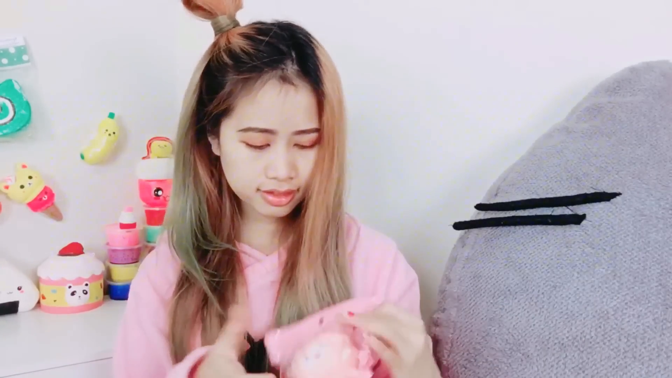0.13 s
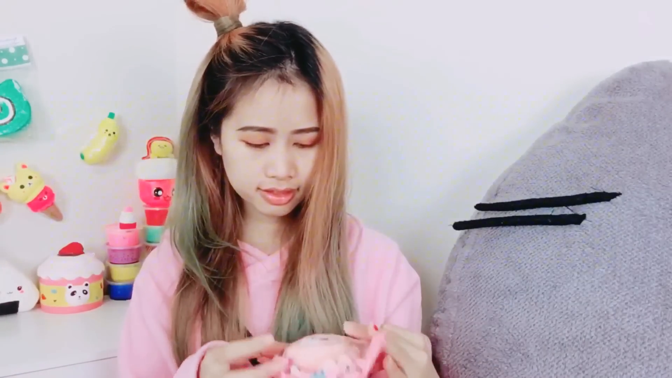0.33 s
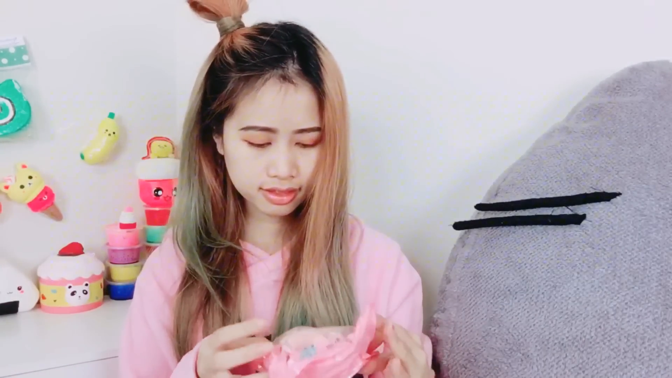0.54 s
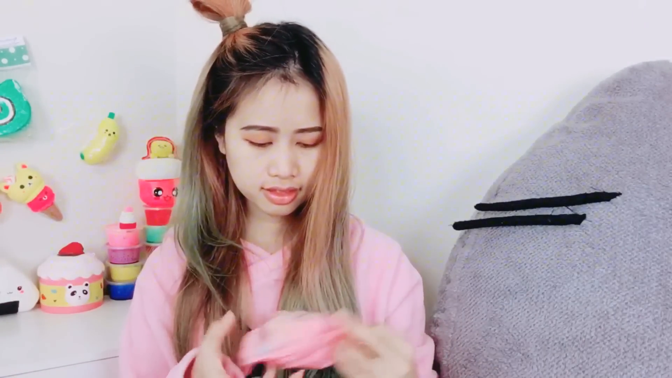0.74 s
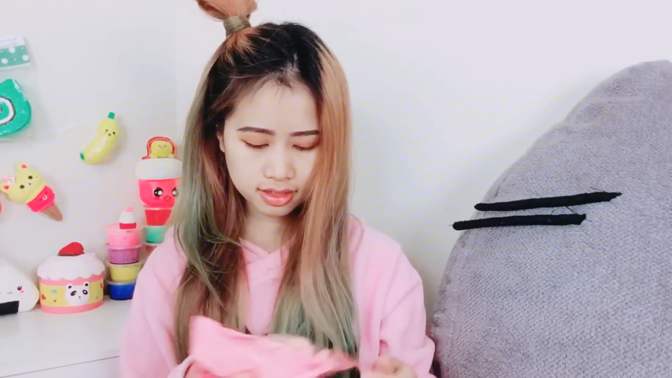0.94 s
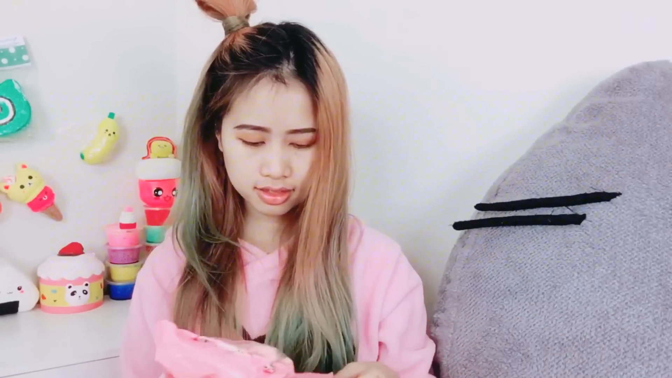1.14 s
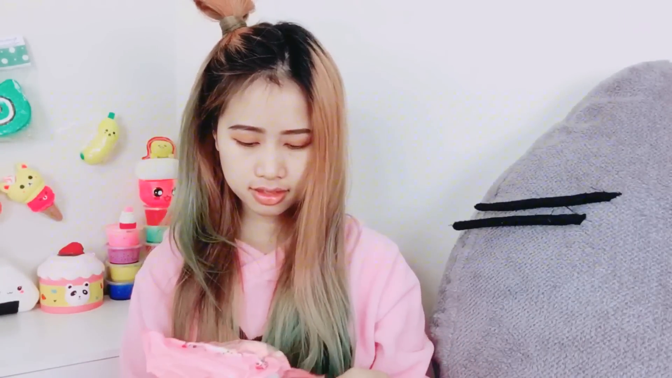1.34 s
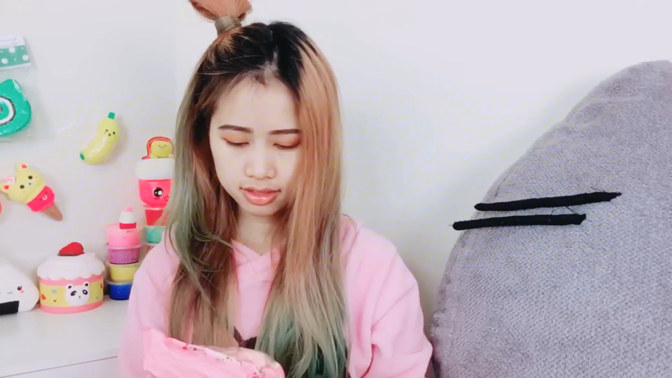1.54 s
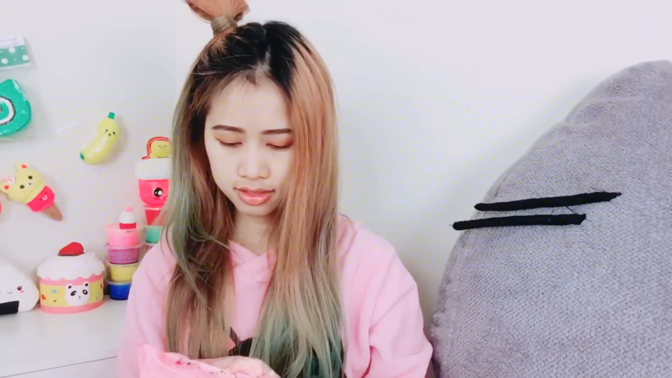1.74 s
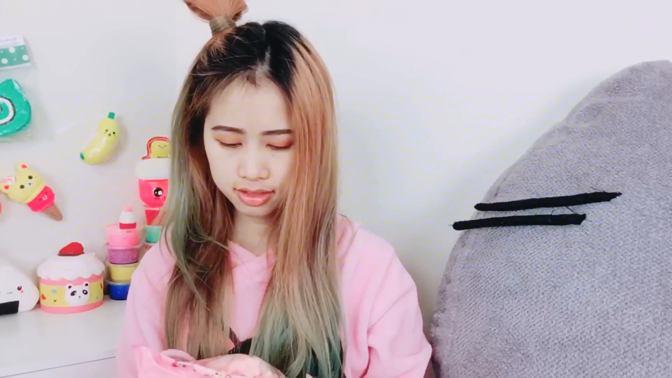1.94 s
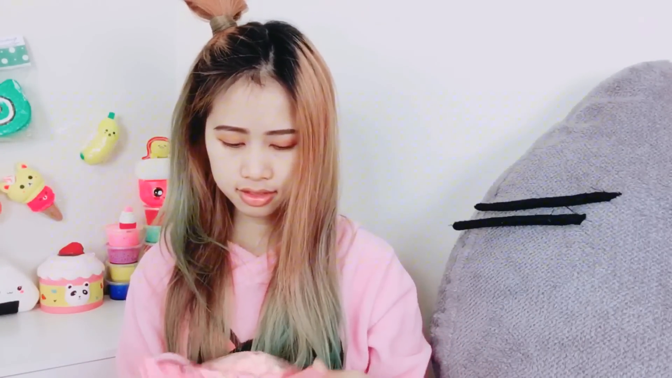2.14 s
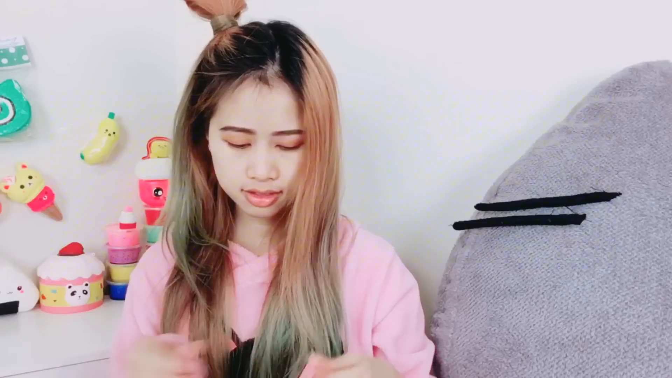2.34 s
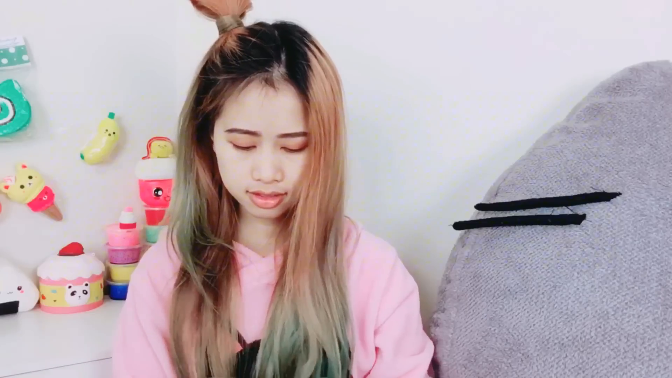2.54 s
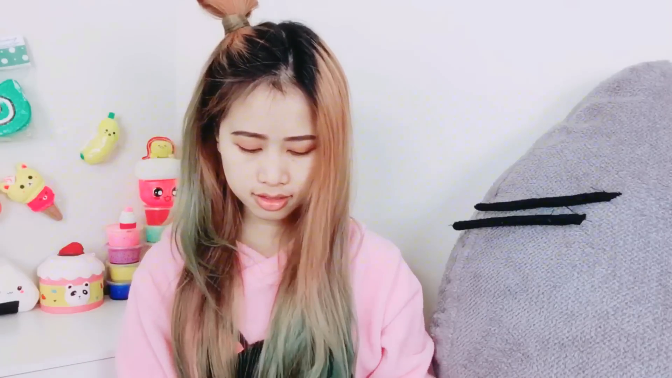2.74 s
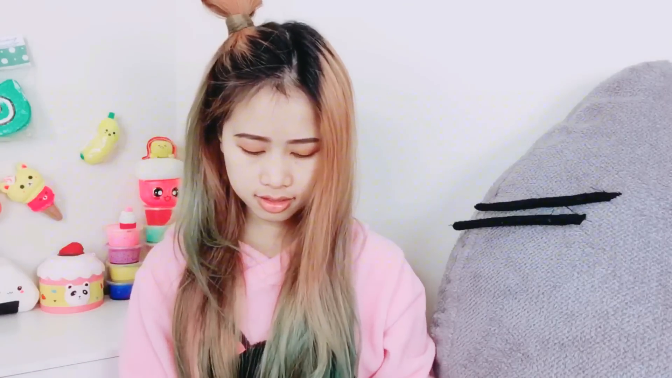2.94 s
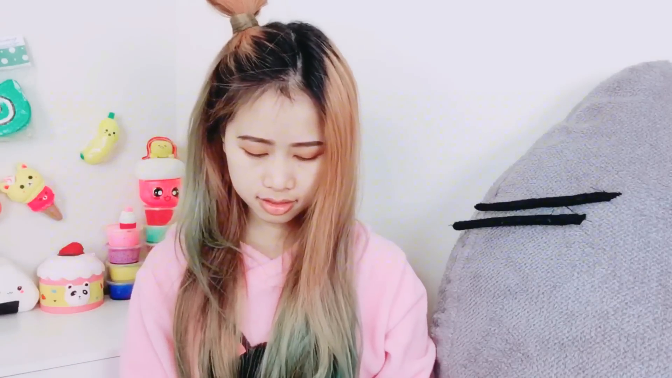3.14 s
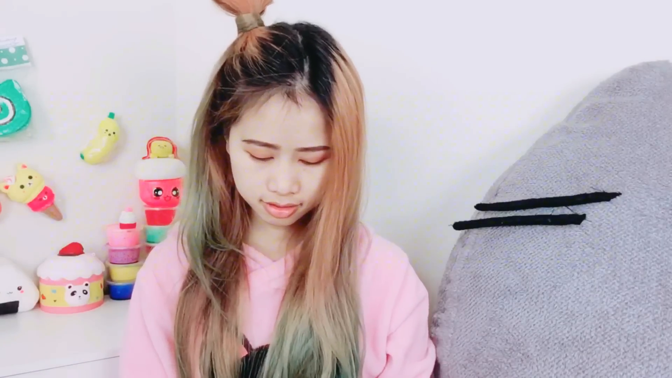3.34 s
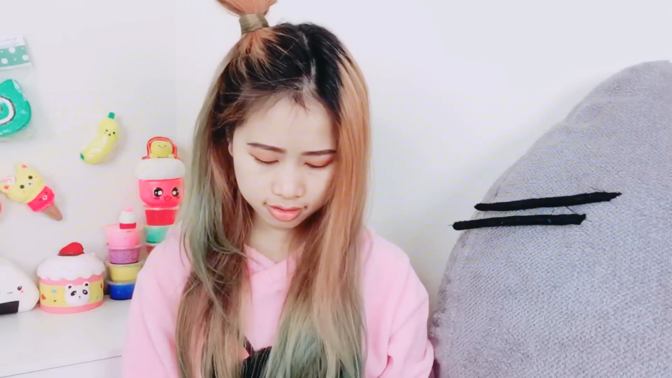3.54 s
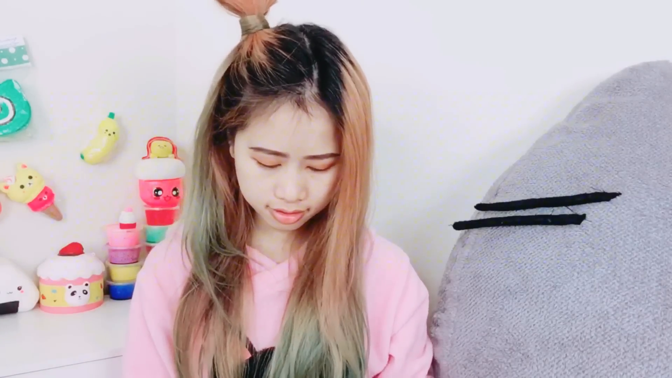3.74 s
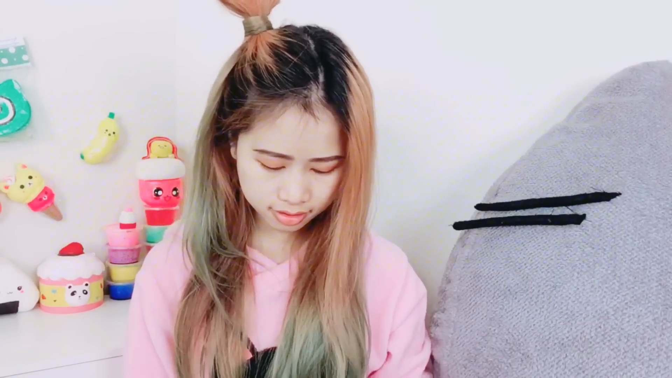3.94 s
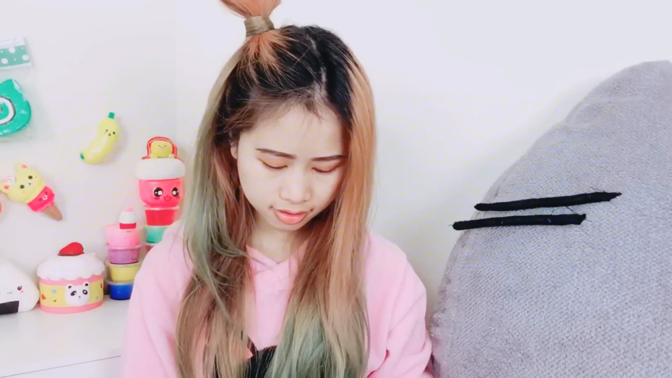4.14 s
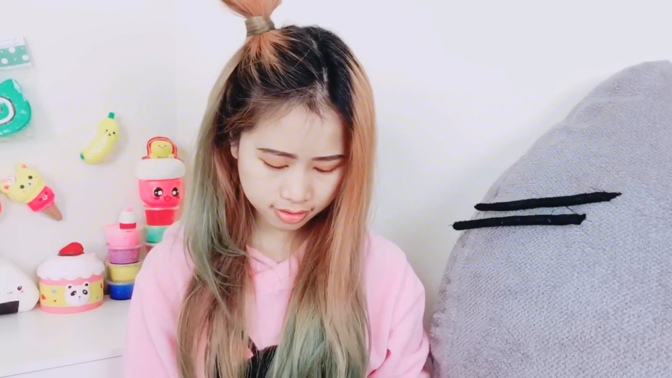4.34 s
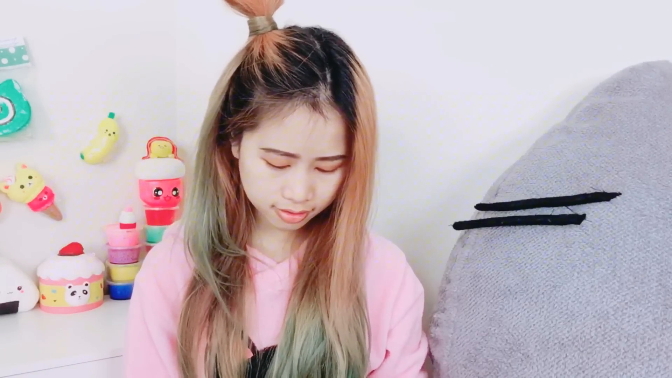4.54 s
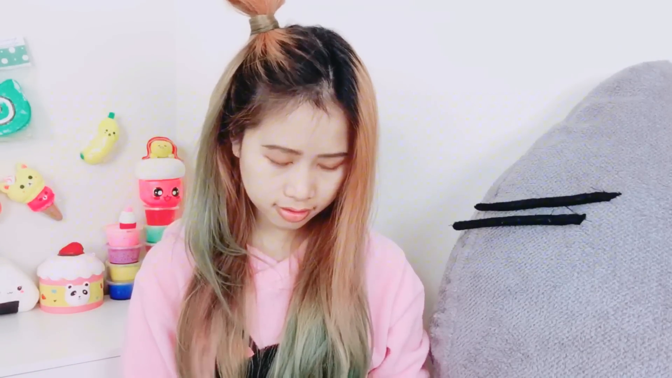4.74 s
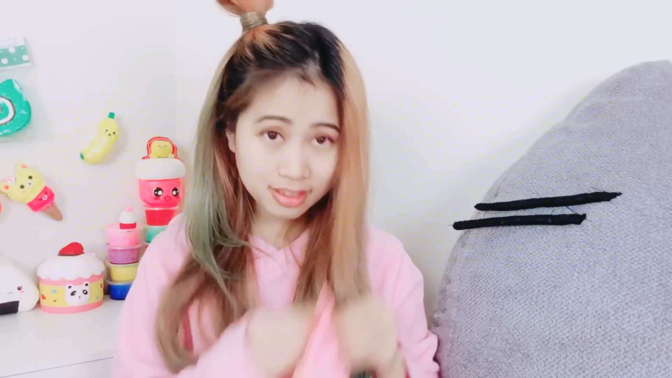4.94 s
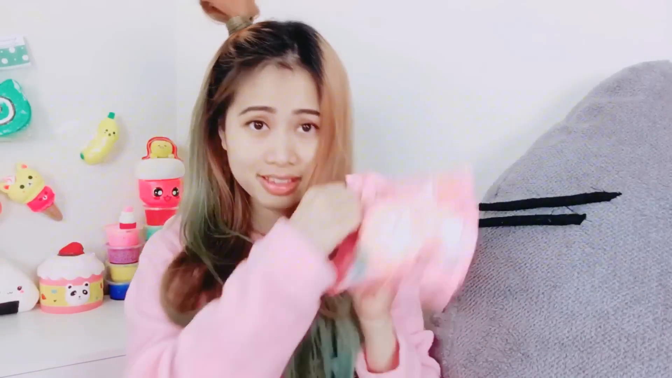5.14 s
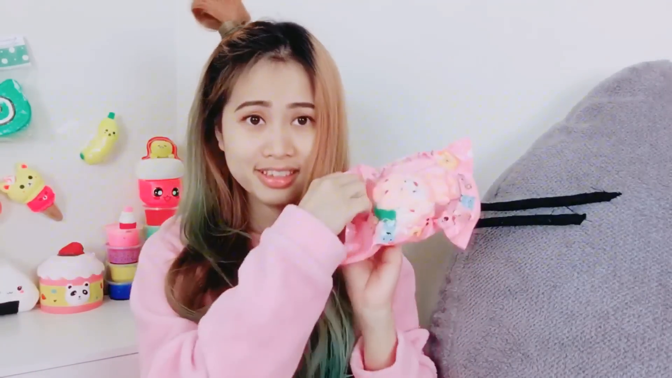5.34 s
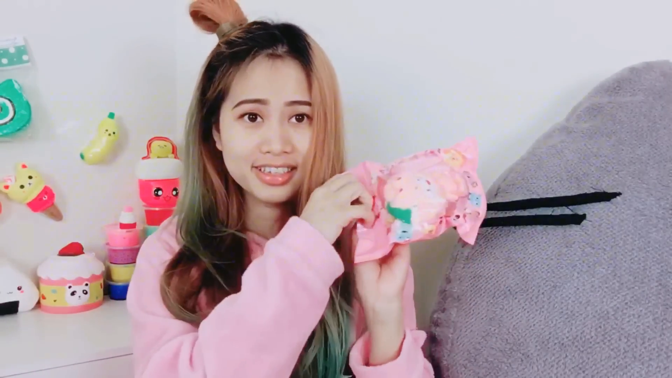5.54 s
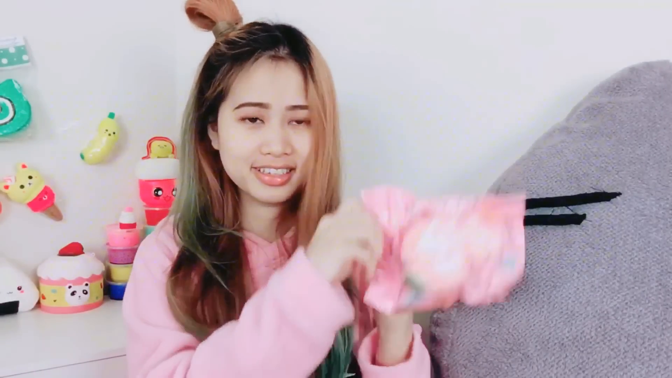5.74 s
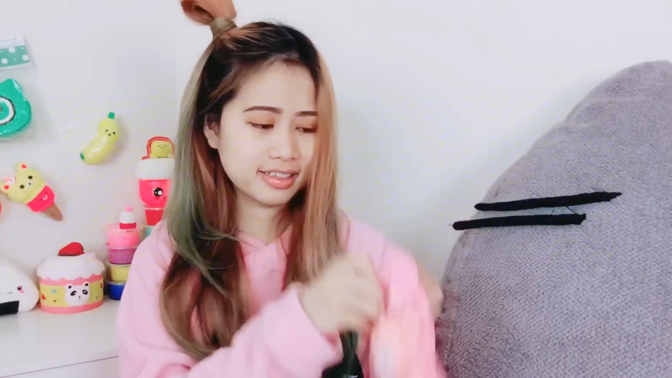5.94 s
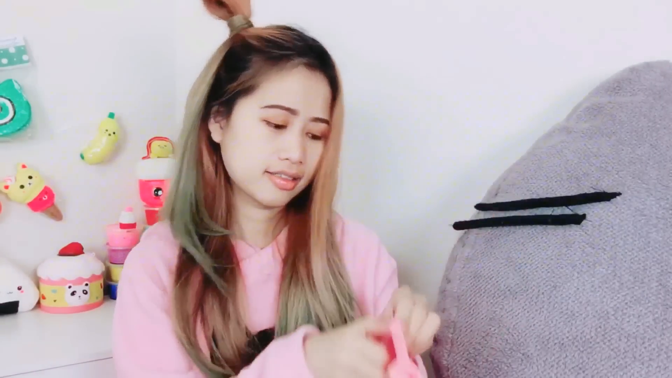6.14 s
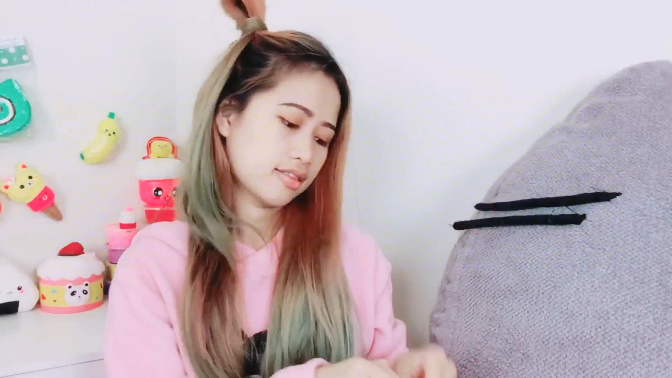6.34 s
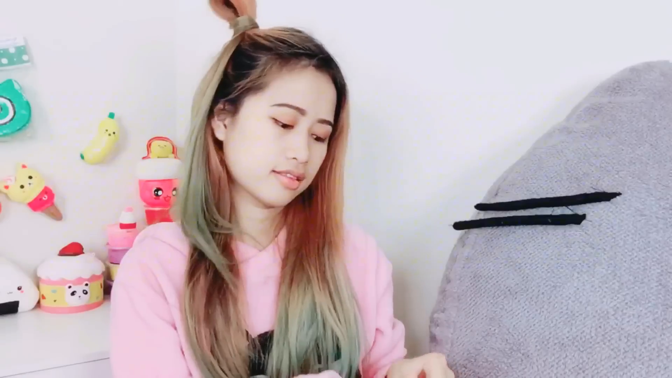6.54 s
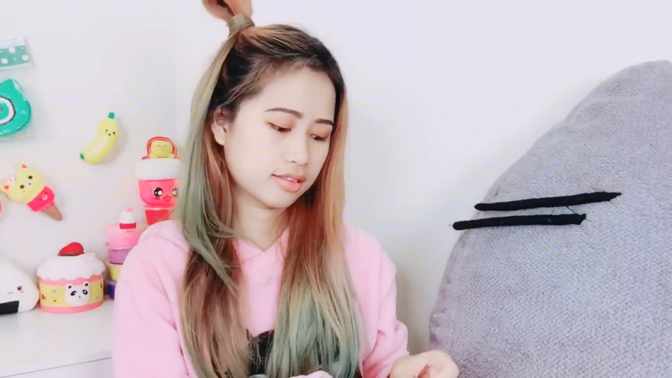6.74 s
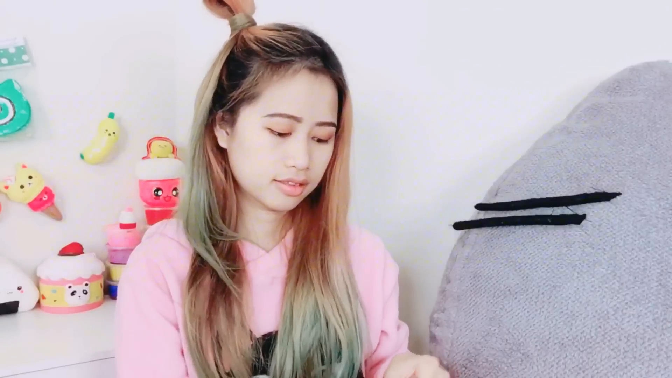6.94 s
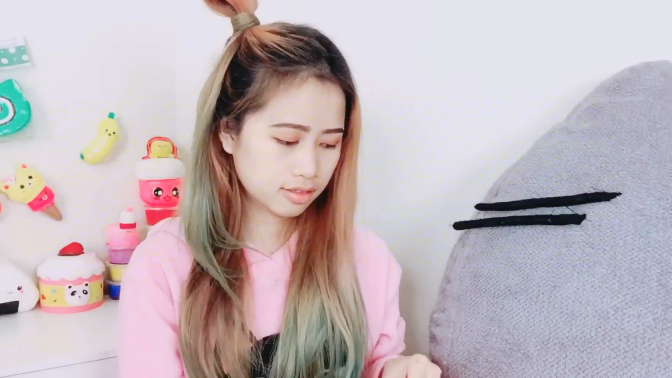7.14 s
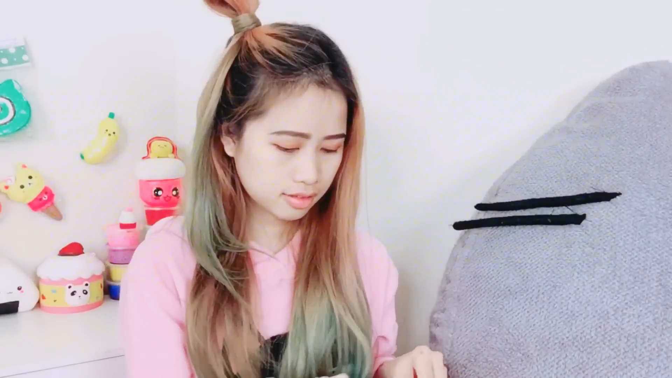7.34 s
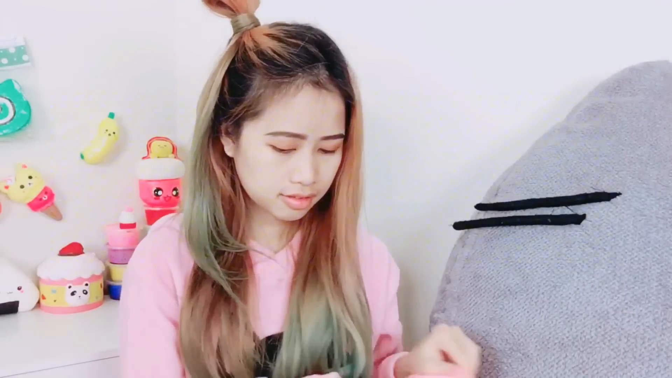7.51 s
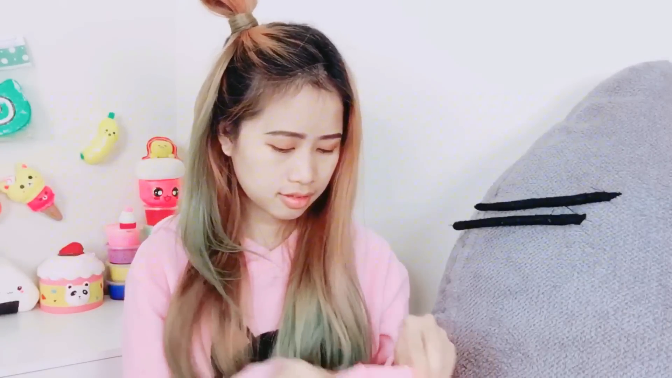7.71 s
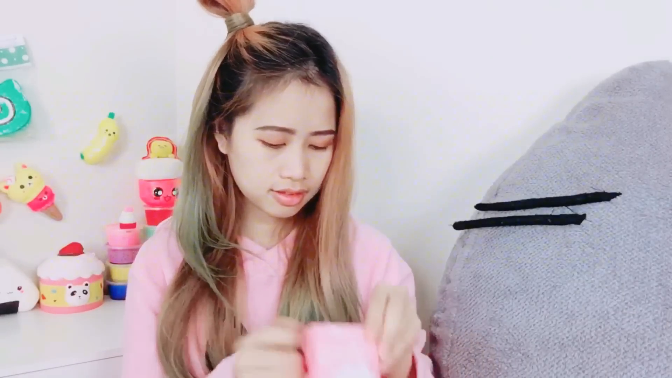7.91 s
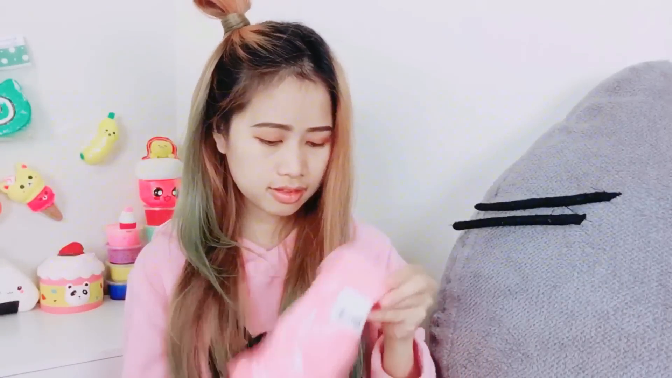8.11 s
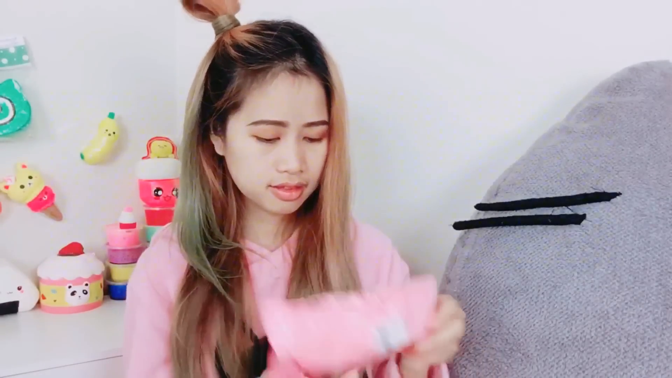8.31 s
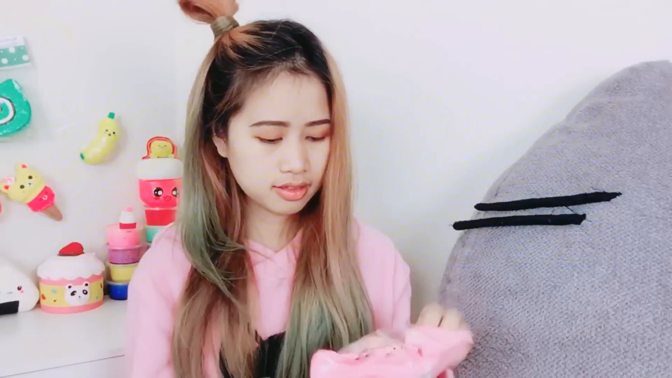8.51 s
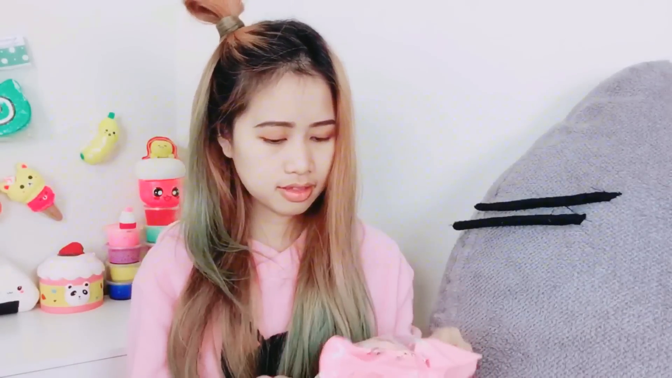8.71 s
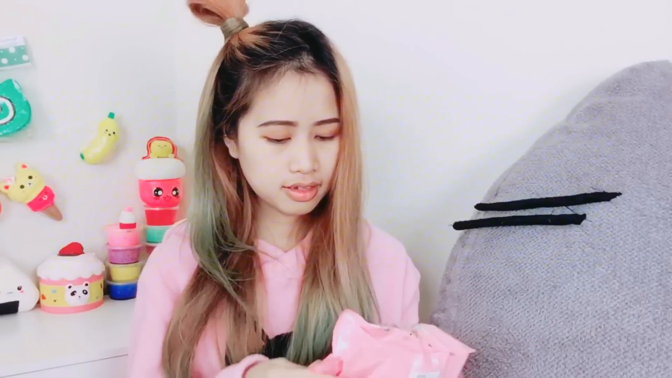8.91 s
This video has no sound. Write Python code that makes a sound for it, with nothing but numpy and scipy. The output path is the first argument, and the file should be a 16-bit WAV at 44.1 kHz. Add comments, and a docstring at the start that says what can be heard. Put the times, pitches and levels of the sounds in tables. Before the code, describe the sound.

Thin, stiff plastic packaging is handled right beside a small microphone in a quiet, soft room with very little echo. From 0 to 0.6 seconds it crackles densely, with bright, hard snaps and a low puff of air. After a short dip, irregular crunches resume from 0.9 to 2.1, with a strong snap near 1.1. A sharp, bright burst comes at 2.4-2.5 with a dull bump. From 2.6 to 5 the rustling is lighter, with scattered ticks and small squeezes around 3.5, 3.8 and 4.6. Near 5.1 there is a tiny rising squeak and a clear knock with a thump. Crinkles gather again from 5.9 to 6.8, then nearly stop around 7. At 7.6 a sudden, very loud crunch slightly overloads, followed by duller crackles, another squeeze at 8.1-8.25, and fading rustles with low air movement until 9.

```python
"""Creases of a thin plastic bag, turned and squeezed close to a small microphone, buckle with sharp snaps.
Each snap is a filtered burst of tiny slips; a dense crackle of smaller buckles and rubbing noise follows
the grip. One short squeak is a rough rising tone, bumps are dying sines, and the moving bag stirs low noise.
A quiet, soft room adds a brief scatter and a hush, and the loudest snaps overload the input."""
import sys
import numpy as np
from scipy import signal
from scipy.fft import rfft, irfft
from scipy.io import wavfile
from scipy.ndimage import uniform_filter1d

SR = 44100
rng = np.random.default_rng(int(sys.argv[2]) if len(sys.argv) > 2 else 0)


def volts_from_db(level):
    """Convert decibel levels to linear amplitude ratios."""
    exponent = np.asarray(level, float) / 20
    return 10 ** exponent


def unload_audio(sound):
    """Save the sound as a 16-bit wav file, at the path given as the first command line argument."""
    columns = np.transpose(np.atleast_2d(sound))
    # keep every value between -1 and 1, then stretch to whole-number steps
    steps = np.round(np.clip(columns, -1, 1) * 32767)
    wavfile.write(sys.argv[1], SR, steps.astype(np.int16))


N = 395577

# Relative spectrum of sound radiated by the film: frequency_hz, density_db [dB per Hz]
FILM_SPECTRUM = [(110, -19.5), (370, -8.5), (760, -4), (1000, -5), (2000, 0), (5900, 5.5), (9200, 3.5),
                 (13000, -4.5), (16200, -13)]


def evened(x):
    """Normalises signal power: scales to rms 1."""
    return x / np.sqrt(np.mean(x ** 2) + 1e-20)


def read(points, hz):
    """Interpolates a spectrum along a logarithmic frequency axis."""
    point_hz, value = np.transpose(points)
    return np.interp(np.log(hz + 1), np.log(np.abs(point_hz) + 1), value)


def add(mix, start_s, sound):
    """Superposition: sums a sound into the mix from its start time."""
    part = mix[max(round(start_s * SR), 0):][:len(sound)]
    part += sound[:len(part)]


def coloured(x, points):
    """Minimum-phase filtering: the Hilbert transform of the log gain gives the phase of a causal response."""
    hz = abs(np.fft.fftfreq(2048, 1 / SR))
    log_gain = np.log(volts_from_db(np.maximum(read(points, hz), -90)))
    response = np.exp(np.conj(signal.hilbert(log_gain)))
    taps = np.fft.ifft(response).real[:512]
    return np.convolve(x, taps / np.linalg.norm(taps))[:len(x)]


def noise(points):
    """Stationary Gaussian noise shaped by a power spectrum, at rms 1."""
    gain = volts_from_db(read(points, np.fft.rfftfreq(N, 1 / SR)))
    return evened(irfft(rfft(rng.standard_normal(N)) * gain, N))


def curve(rows, rest_db):
    """Exponential growth and decay: powers of all swells, each 20 dB per build or fade time, add to a rest."""
    t = np.arange(0, N + 64, 64) / SR
    power = volts_from_db(rest_db) ** 2
    for peak_s, level_db, build_s, fade_s in rows:
        # a time's sign is ignored; a zero time makes that side abrupt
        distance = np.maximum((peak_s - t) / abs(build_s), (t - peak_s) / abs(fade_s))
        power = power + volts_from_db(level_db - 20 * distance) ** 2
    return np.interp(np.arange(N) / SR, t, np.sqrt(power))


def ring(hz, cycles, size=400):
    """Damped free oscillation: a sine that decays by 1/e in the given cycles, at unit energy."""
    turns = hz * np.arange(size) / SR
    wave = np.sin(2 * np.pi * turns) * np.exp(-turns / cycles)
    return wave / np.linalg.norm(wave)


def buckle(hz, slips, spread_s, ring_db=-5.0, cycles=1.08, tilt_db=3.5):
    """Snap-through buckling: tiny slips crowd round one release; snaps with a higher colour centre sound
    brighter."""
    u = (np.arange(len(slips)) - len(slips) / 2) / SR / spread_s
    # cubing leaves a few strong slips among many weak ones
    burst = slips ** 3 * np.hanning(len(u)) / (1 + u ** 2)
    ringing = np.convolve(burst, ring(hz, cycles))[:len(u)]
    octaves = np.log2(hz / 4000)
    colour = [(f, db + tilt_db * np.log2(f / 4000) * octaves) for f, db in FILM_SPECTRUM]
    wave = coloured(burst + volts_from_db(ring_db) * ringing, colour)
    return wave / abs(wave).max()


def snaps():
    """Impulsive buckling of creases; the duller the snap, the stronger the low push of the whole fold."""
    # Clear snaps of single creases: peak_s, peak_db, colour_centre_hz
    snap_rows = [(0.02, -10, 2640), (0.042, -2, 5450), (0.0596, -0.5, 3730), (0.099, -2, 4330),
                 (0.114, -4, 4000), (0.131, -3.5, 1820), (0.154, -4.5, 5860), (0.2898, -17.5, 4750),
                 (0.308, -11, 4700), (0.3247, -2, 3500), (0.3415, 1, 4230), (0.367, 0, 3960),
                 (0.3729, 4, 3520), (0.415, -8, 6100), (0.428, -4.5, 5740), (0.4499, 3, 4040),
                 (0.467, -8, 3000), (0.509, -1, 5640), (0.537, -0.5, 5060), (0.545, -4, 2540),
                 (0.585, -17.5, 2040), (0.6465, -12.5, 5240), (0.708, -8.5, 4830), (0.8778, -13.5, 4030),
                 (0.897, -8, 3080), (0.915, -10, 6070), (0.9254, -7.5, 6060), (1, -2.5, 4230),
                 (1.043, 0, 3940), (1.0134, -6, 2700), (1.0504, 1.5, 3780), (1.0697, -2, 5370),
                 (1.0807, 10, 3480), (1.1091, -10, 3680), (1.116, -2, 3600), (1.208, -7.5, 3700),
                 (1.21, -4, 2500), (1.2401, -4, 3130), (1.329, 4, 5950), (1.3309, 6.5, 4700),
                 (1.347, -7, 5400), (1.374, -2, 5630), (1.3844, 3, 3700), (1.429, -3.5, 4100),
                 (1.525, -2, 4130), (1.532, -1.5, 6500), (1.548, -8, 4620), (1.5871, 4, 4560),
                 (1.598, -2.5, 2770), (1.6566, 0.5, 4200), (1.7071, -2.5, 3440), (1.731, -6, 5500),
                 (1.7434, -6, 3780), (1.763, 1.5, 2520), (1.873, -8, 5300), (1.8816, 0, 5900),
                 (1.9785, -6.5, 2800), (2.019, 4, 5830), (2.043, -19, 2740), (2.0585, -6.5, 4410),
                 (2.0703, -7, 2530), (2.1013, -6, 6000), (2.1588, -9, 5900), (2.167, -6, 4000),
                 (2.201, -17, 2500), (2.2353, -16, 2770), (2.244, -19, 2640), (2.3381, -3, 2820),
                 (2.352, -5, 4600), (2.364, -1.5, 5100), (2.397, 1, 7100), (2.4086, 2, 7300),
                 (2.4571, 9, 7750), (2.474, 2.5, 3520), (2.4933, 2, 3450), (2.592, -8, 3300),
                 (2.579, -17, 2600), (2.638, -14, 2500), (2.764, -3, 5440), (2.868, 0, 6260),
                 (3.1064, -7.5, 4140), (3.1217, -3.5, 4630), (3.1491, -2, 6500), (3.17, 0, 7660),
                 (3.214, -4, 6940), (3.2782, -8.5, 4960), (3.406, -9.5, 3880), (3.4928, -7.5, 4600),
                 (3.539, -10.5, 3260), (3.633, -8, 3000), (3.712, -4, 4400), (3.7562, -4, 3830),
                 (3.761, -3.5, 3670), (3.777, 5, 5260), (4.001, -1, 9800), (4.0419, -6.5, 3570),
                 (4.1241, -3, 4480), (4.1369, -7.5, 4580), (4.1942, -8, 5300), (4.461, -13.5, 3700),
                 (4.527, -8, 4660), (4.626, -13, 4570), (4.64, -13, 2900), (4.727, -11.5, 4030),
                 (4.8952, -8, 6540), (4.965, -2.5, 3700), (4.9974, -5.5, 4650), (5.087, 0.5, 2840),
                 (5.142, -7.5, 1110), (5.1736, -2, 3500), (5.2272, -8.5, 4030), (5.2814, -8, 4650),
                 (5.2992, -6.5, 6850), (5.544, -13, 6400), (5.609, -6, 4580), (5.7225, -7, 8100),
                 (5.839, -7, 3600), (5.8719, -14, 4940), (5.895, -5.5, 5900), (5.9382, 1, 5000),
                 (5.959, -3, 3360), (6.0125, 2.5, 5730), (6.044, -18, 1950), (6.054, -16, 3220),
                 (6.1143, -8, 4520), (6.1192, 1, 4740), (6.1209, 1.5, 2370), (6.1623, -8, 3980),
                 (6.172, 0, 2730), (6.179, -4, 3570), (6.207, -15, 2020), (6.227, -7, 2240),
                 (6.262, -6, 4270), (6.2833, 2, 3450), (6.31, -7, 3540), (6.331, -5, 2730),
                 (6.343, -7, 3200), (6.356, -5.5, 3130), (6.4623, -3.5, 5150), (6.5078, -6.5, 4800),
                 (6.59, -8.5, 2320), (6.6105, -7.5, 5470), (6.617, -6.5, 3630), (6.791, -9, 4560),
                 (6.802, 3.5, 4470), (6.814, 4.5, 5130), (6.912, -9.5, 8550), (7.2064, -2, 4700),
                 (7.269, -4.5, 5700), (7.2794, -4.5, 5800), (7.2876, -3, 3770), (7.355, -12.5, 3760),
                 (7.4553, 2, 4770), (7.4583, 0, 2130), (7.4987, -4.5, 6300), (7.5711, -2, 4270),
                 (7.62, 9, 5500), (7.626, 10, 4070), (7.6291, 8, 3500), (7.6586, 5, 4500),
                 (7.6723, 6, 3600), (7.6826, 6, 2470), (7.6858, 7, 4000), (7.722, -4, 1880),
                 (7.73, -0.5, 2520), (7.743, -8, 2520), (7.769, -3.5, 2080), (7.798, -10, 6000),
                 (7.873, -7.5, 1630), (7.883, -11, 1820), (7.903, -2.5, 1490), (7.938, -9, 1660),
                 (7.969, -10.5, 5500), (7.991, -10.5, 2460), (8.009, -14, 2000), (8.0404, -6, 2036),
                 (8.1012, 5, 4170), (8.1205, 2, 2880), (8.15, -5.5, 1930), (8.204, -5.5, 1780),
                 (8.223, -7.5, 1720), (8.235, 0, 3440), (8.254, -6, 4340), (8.4666, -3.5, 2480),
                 (8.497, -10.5, 3550), (8.569, -5, 2610), (8.59, -7, 4470), (8.615, -7, 4000),
                 (8.7056, -13.5, 1770), (8.9074, -10, 2520)]
    out = np.zeros(N)
    luck = rng.standard_normal((len(snap_rows), 502))
    for (peak_s, peak_db, hz), (length, pitch, *slips) in zip(snap_rows, luck):
        wave = buckle(hz, np.array(slips), 0.00033 * np.exp(0.45 * length))
        add(out, peak_s - abs(wave).argmax() / SR, volts_from_db(peak_db) * wave)
        push = ring(700 * np.exp(0.35 * pitch), 1.0, size=800)
        push_db = peak_db - 25.0 - 7.3 * np.log2(hz / 4000)
        add(out, peak_s, volts_from_db(push_db) * np.sign(length) * push / push.max())
    return out


def crackle(count=60):
    """Random point process: small folds buckle in clumps of loudness, more often under a firmer grip."""
    # Squeezes of the hands: firmest_s, level_db, build_20db_s, release_20db_s
    squeeze_rows = [(0.065, -22.5, .3, 0.0842), (0.14, -26.5, 9.5, 0.11), (0.3, -42.5, -0.5, 0.3),
                    (0.36, -22, 0.09, 0.05), (0.455, -21.5, 0.1, 0.07), (0.54, -25.5, 0.02, .06),
                    (0.715, -35, .015, 0.13), (0.76, -42, 0.5, -0.2), (0.912, -33, 0.23, -0.9),
                    (1.005, -32, -0.02, 0.25), (1.062, -24, .1, 0.23), (1.215, -37, -0.3, 0.05),
                    (1.333, -29, 0.04, 0), (1.417, -26.5, 0.15, .15), (1.535, -26, 0.18, 0.05),
                    (1.6, -35, 0.17, 0.17), (1.74, -27, 0.16, 0.16), (1.882, -29.5, 0.5, 0.1),
                    (2.05, -32, 0.2, .05), (2.165, -36, -1, 0.2), (2.395, -17.5, 0.04, 0.04),
                    (2.475, -19.5, 0.05, 0.09), (2.62, -32, 0.19, 0.12), (2.798, -30.5, 0.22, 0.23),
                    (3.17, -36, 0.37, 0.8), (3.46, -24.5, 0.03, 0.05), (3.56, -31, 0.18, 0.46),
                    (3.74, -29, 0.18, 0.08), (3.86, -30, 0.08, .07), (4.013, -28.5, 0.06, 0.02),
                    (4.135, -30.5, 0.17, 0.22), (4.414, -32.5, 0.12, .06), (4.639, -26, 0.13, .1),
                    (4.8, -42, 0, 1.2), (4.975, -32.5, 0.07, 0.8), (5.16, -21.5, 0.1048, 0.02),
                    (5.356, -36.5, .5, .5), (5.65, -40.5, 0, 0.8), (5.855, -28, 0.26, .43),
                    (6.18, -35.5, .5, 0.47), (6.27, -27, 0.08, .5), (6.5, -34, .5, 0.22),
                    (6.61, -32, 0.26, 0.18), (6.811, -29.5, 0.09, 0.2), (7.05, -45.5, -1.8, 2),
                    (7.28, -39.5, 0.54, -2.4), (7.39, -35.5, 0.43, 0.16), (7.465, -26.5, 0.12, 0.16),
                    (7.622, -9, 0, 0.08), (7.69, -21, 0.085, 0.01), (7.73, -19.5, 0.0551, 0.17),
                    (7.89, -25, 0.24, 0.07), (8.045, -29, 0.13, 0.11), (8.112, -22.5, 0.06, 0.13),
                    (8.245, -25.5, 0.04, 0.07), (8.475, -31, 0, 0.5), (8.6, -24.5, 0.16, 0.02),
                    (8.78, -32.5, 0.5, 0.26)]
    holding_db = -59.5
    # folds per second at a -35 dB grip; the power of grip strength by which the rate grows
    folds_per_s, extra_folds = 210, 0.42

    patches = uniform_filter1d(uniform_filter1d(rng.standard_normal(N), 400), 400)
    clumps = volts_from_db(3.88 * evened(patches))
    # exponential spread in dB: a few folds are much larger than the rest
    size = volts_from_db(6.6 * np.minimum(rng.exponential(1, N), 2.2)) * clumps
    facet = rng.integers(0, count, N)
    slips = rng.standard_normal((count, 500))
    folds = [buckle(hz, row, 0.00026) for hz, row in zip(np.geomspace(1800, 9000, count), slips)]

    grip = curve(squeeze_rows, holding_db)
    chance = folds_per_s * (grip / volts_from_db(-35)) ** extra_folds / SR
    out = np.zeros(N)
    for at in np.flatnonzero(rng.random(N) < chance):
        add(out, at / SR, size[at] * folds[facet[at]])
    return grip * (evened(out) + volts_from_db(-4.5) * clumps ** 0.8 * rub())


def rub(patchy_db=4, dull_db=-8.5):
    """Sliding friction of skin and film: dull noise shifts colour in patches as facets touch and part."""
    hz, _, z = signal.stft(noise(FILM_SPECTRUM), SR, nperseg=256)
    patches = uniform_filter1d(rng.standard_normal(z.shape), 8, 0)  # along frequency
    patches = evened(uniform_filter1d(patches, 6, 1))  # along time
    slope_db = dull_db * np.log2(hz[:, None] / 1000 + 1)
    return evened(signal.istft(z * volts_from_db(patchy_db * patches + slope_db), nperseg=256)[1][:N])


def squeak(size=1250):
    """Uneven stick-slip: a jittered rising tone with a weaker half-rate partner."""
    # A fingertip slips on taut film: start_s, from_hz, to_hz, main_tone_db
    slip_row = (5.108, 3850, 4400, -25)
    start_s, from_hz, to_hz, level_db = slip_row
    jitter = 1 + 0.15 * rng.standard_normal(size)
    turns = np.cumsum(np.linspace(from_hz, to_hz, size) * jitter) / SR
    tone = np.sin(2 * np.pi * turns) + np.sin(np.pi * turns) / 2
    out = np.zeros(N)
    add(out, start_s, volts_from_db(level_db) * np.hanning(size) ** 0.5 * tone)
    return out


def bumps():
    """Damped pressure swings with a half-cycle push and slow rebound; higher knocks ring for more cycles."""
    # Bumps, knocks and puffs at the microphone: start_s, peak_db, swing_hz
    bump_rows = [(0.201, -8, 212), (0.449, -9, 810), (0.448, -12.5, 79.5), (1.077, -22, 159),
                 (1.44, -18.5, 252), (2.02, -20, 237), (2.473, -11.5, 140), (2.525, -18, 245),
                 (2.634, -17, 57.7), (2.81, -20, 660), (5.112, -20.5, 250), (5.155, -14.5, 201),
                 (5.171, -5, 760), (5.173, -2.5, 99.5), (6.35, -19.5, 143), (6.42, -20, 216),
                 (8.233, -13, 65)]
    rebound = ring(5.86, 0.73, size=16000)
    out = np.zeros(N)
    for start_s, peak_db, hz in bump_rows:
        half_cycle = np.hanning(round(SR / hz / 2))
        swing = np.convolve(ring(hz, 0.65 + hz / 800, size=4000), half_cycle)
        add(out, start_s, volts_from_db(peak_db) * swing / swing.max())
        add(out, start_s, volts_from_db(peak_db - 17.5) * rebound / rebound.max())
    return out


def air():
    """Turbulent pressure: the bag swinging past the microphone stirs lumpy low-frequency noise."""
    # Swings of the bag past the microphone: nearest_s, level_db, fade_20db_s
    gust_rows = [(0.12, -15, 0.34), (1.12, -36, 1), (2.56, -25, 0.5), (3.5, -34, .5), (5.26, -27.5, .5),
                 (6.65, -28, 0.05), (8.15, -31.5, 1.5), (8.68, -23, 0.5)]
    # Relative spectrum of the stirred air: frequency_hz, density_db [dB per Hz]
    air_spectrum = [(3.5, -54), (6, 0.5), (17, 6), (43, -8.5), (102, -13.5), (156, -19.5), (300, -25.5),
                    (600, -66.5)]
    build_share, still_air_db = 0.56, -36.5  # build time as a share of fade time; draught between gusts
    swells = [(s, db, build_share * fade_s, fade_s) for s, db, fade_s in gust_rows]
    return curve(swells, still_air_db) * noise(air_spectrum)


def scatter(x, t60_s=0.055):
    """Diffuse reverberation: bag, hands and lap return an exponentially decaying random response."""
    t = np.arange(SR // 8) / SR
    tail = rng.standard_normal(len(t)) * volts_from_db(-60 * t / t60_s) * (t > 0.001)
    return signal.oaconvolve(x, tail / np.linalg.norm(tail))[:N]


def hush():
    """Stationary background noise: the quiet room and input hiss."""
    # Relative spectrum of the hush: frequency_hz, density_db [dB per Hz]
    hush_spectrum = [(60, -3), (150, 10), (1000, -7), (5000, -43), (16000, -12)]
    return volts_from_db(-56.5) * noise(hush_spectrum)


def scene():
    """Linear superposition of the bag, its scatter, the air and bumps at the microphone, and the hush."""
    bag = snaps() + crackle() + squeak()
    scattered = volts_from_db(-15.0) * scatter(bag)
    return (bag + scattered + air() + bumps() + hush())[None]


def roll_off(x):
    """The treble ends steeply here."""
    return signal.sosfilt(signal.butter(12, 16370, fs=SR, output="sos"), x)


def record(dry):
    """Destructive interference at the microphone port cancels one band; the input then clips at full scale."""
    notch_hz, notch_width_hz = 11630, 2100
    b, a = signal.iirnotch(notch_hz, notch_hz / notch_width_hz, SR)
    ported = signal.lfilter(b, a, dry)
    # a little unfiltered sound keeps the notch from being infinitely deep
    mix = np.clip(ported + 0.013 * dry, -1, 1)
    return roll_off(mix)


dry = scene()
out = record(dry)
unload_audio(out)
```